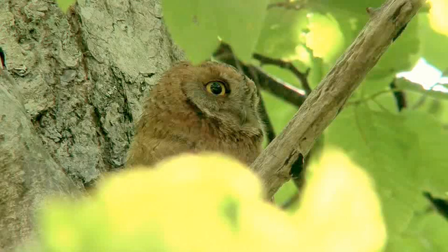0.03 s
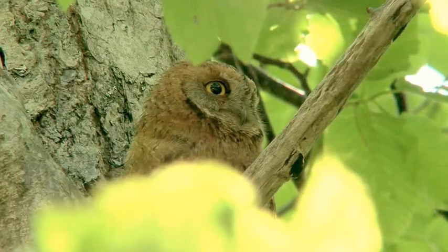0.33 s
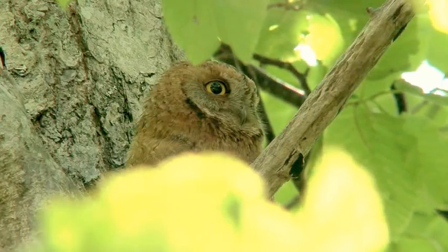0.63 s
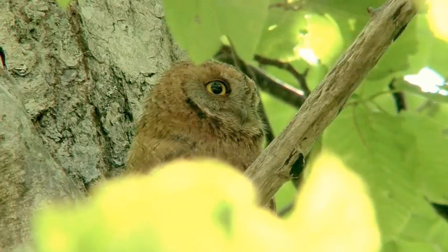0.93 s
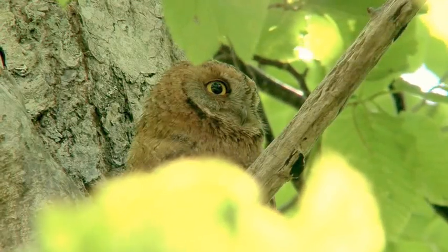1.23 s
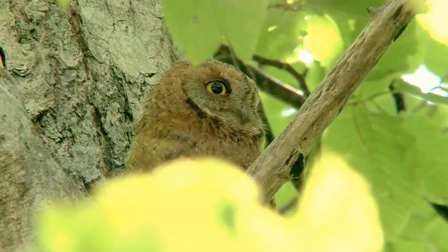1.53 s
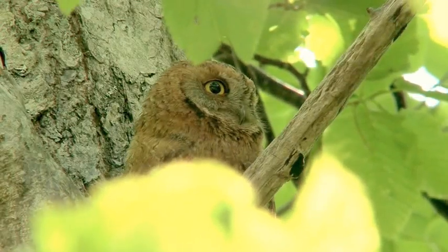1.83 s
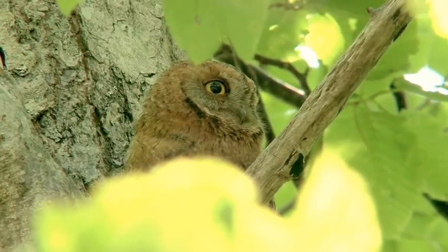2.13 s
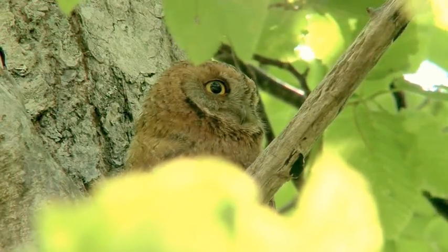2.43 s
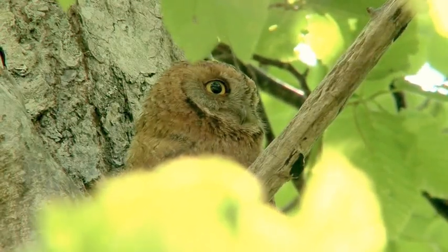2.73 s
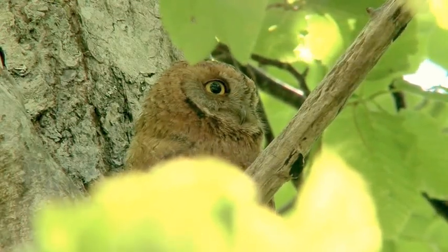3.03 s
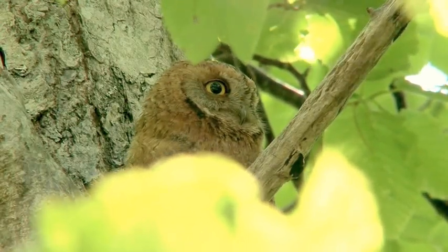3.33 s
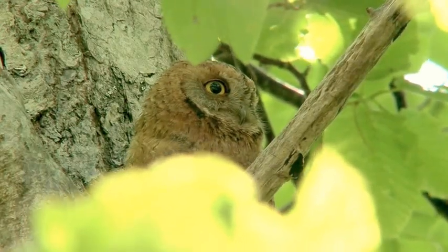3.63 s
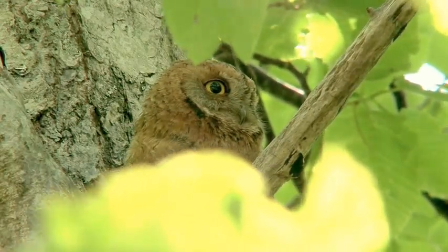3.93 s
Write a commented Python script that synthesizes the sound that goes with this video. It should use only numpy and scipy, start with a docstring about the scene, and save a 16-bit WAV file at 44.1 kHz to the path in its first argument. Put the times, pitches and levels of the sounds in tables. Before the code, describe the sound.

A cicada buzzes close to the microphone in quick, even, high-pitched throbs, then turns ragged and stops. Behind it, trees hiss steadily over a low rumble, with a faint far insect and a few distant bird notes.

```python
"""Cicada in a leafy wood

Near the microphone an insect, probably a cicada, throbs: its tymbals click about 260 times a second into
a narrow resonance near 3 kHz, faster and louder within each throb, until the song frays and stops.
A second one sings far off, a little to the right; a few distant bird notes sit in the trees' hiss."""
import sys
import numpy as np
from scipy import signal
from scipy.fft import rfft, irfft
from scipy.io import wavfile
from scipy.ndimage import uniform_filter1d

SR = 44100
rng = np.random.default_rng(int(sys.argv[2]) if len(sys.argv) > 2 else 0)


def persist_wave(psi):
    """Save psi, clipped to +-1, as 16-bit WAV."""
    counts = np.round(np.clip(psi, -1, 1) * 32767).astype(np.int16)
    wavfile.write(sys.argv[1], SR, np.atleast_2d(counts).T)


N = 176400


def amp(db):
    """Decibels to gain."""
    return 10 ** (np.asarray(db) / 20)


def unit(x):
    """Scales to rms 1."""
    return x / np.sqrt(np.mean(x ** 2) + 1e-20)


def read_spectrum(points, hz):
    """Reads a spectrum table on a log-frequency axis."""
    f, value = np.transpose(points)
    return np.interp(np.log(hz + 1), np.log(f + 1), value)


def clock():
    """Time of every sample, in seconds."""
    return np.arange(N) / SR


def drift(hz):
    """Smooth random wander of rms 1, up to about hz."""
    f = np.fft.rfftfreq(N, 1 / SR)
    return unit(irfft(rfft(rng.standard_normal(N)) * np.exp(-(f / hz) ** 2), N))


def pan(db):
    """Channel gains for a left-minus-right level."""
    return amp([[db / 2], [-db / 2]])


def resonate(x, hz, width_hz):
    """A resonance of gain 1 that follows the curve hz."""
    turn = np.exp(2j * np.pi * np.cumsum(hz) / SR)
    pole = np.exp(-np.pi * width_hz / SR)
    return 2 * (turn * signal.lfilter([1 - pole], [1, -pole], x / turn + 1e-18)).real


def wood_echoes(x, t60_s=.4, build_s=.008):
    """Scattered echoes from trunks and leaves, different at each microphone, as strong as x."""
    t = np.arange(SR // 2) / SR
    taps = rng.standard_normal((2, len(t))) * (rng.random((2, len(t))) < .1)
    tail = taps * np.exp(-np.log(1000) * t / t60_s) * np.minimum(t / build_s, 1)
    wet = signal.fftconvolve(x[None], tail, axes=1)[:, :N]
    return wet * x.std() / wet.std(axis=1, keepdims=True)


# Throbs of the near cicada: centre_s, relative_level_db, top_click_rate_hz, half_length_s
SONG_THROBS = [(0.094, -1, 262, .024), (0.217, -1.5, 261.5, .025), (.347, -0.9, 261.2, 0.028),
               (.466, 0, 261.5, 0.024), (.597, 0.6, 260.4, 0.026), (.734, -1.5, 258.8, .030),
               (0.861, -2, 259.5, .031), (.986, -1.8, 258.1, .033), (1.118, -1.5, 260.5, 0.029),
               (1.26, -0.4, 259.6, 0.029), (1.394, -1, 259, .031), (1.534, -1.5, 259.6, .030),
               (1.675, -1, 261, 0.032), (1.818, -2, 258.4, .033), (1.96, 0.1, 260, .030),
               (2.092, -1.2, 257.5, .033), (2.246, 0.1, 260.5, .029), (2.401, -0.5, 260, .025),
               (2.54, -3.5, 257.5, .027), (2.689, -4.5, 256, .033), (2.83, -4.5, 250.8, .035),
               (2.995, -10.5, 243.6, .030), (3.115, -8.5, 245, 0.0364)]
# Uneven timing of its clicks, growing as the song frays: time_s, scatter_ms
CLICK_SCATTER = [(.1, .011), (2.7, .011), (2.83, .07), (3.15, .1)]


def cicada(rest_rate_hz=241.5, between_throbs_db=-9.6, end_s=3.16, release_s=.028, level_db=-24):
    """Close by, left of centre: tymbal clicks ring the body, faster, higher and louder in each throb."""
    t = clock()
    rate, level = np.full(N, rest_rate_hz), np.full(N, amp(between_throbs_db))
    for centre, db, top_hz, half in SONG_THROBS:
        away = abs(t - centre) / (half * np.where(t < centre, .92, 1))  # rises quicker than it falls
        rate += (top_hz - rest_rate_hz) * np.exp(-(away / 1.5) ** 4.2)  # flat-topped arch
        level += (amp(db) - amp(between_throbs_db)) * np.exp(-away ** 2.7)
    level *= np.exp(-np.maximum(t - end_s, 0) / release_s)
    # One click a cycle; the timing loosens as the muscle slackens between throbs.
    cycles = np.cumsum(rate * (1 + .004 * drift(64))) / SR
    slip, size = rng.standard_normal((2, N))[:, :int(cycles[-1])]
    due_s = np.interp(np.arange(len(slip)), cycles, t)
    slack = 1 - (rate - rest_rate_hz) / (rate.max() - rest_rate_hz)
    scatter_ms = np.interp(due_s, *np.transpose(CLICK_SCATTER)) + .044 * np.interp(due_s, t, slack ** 2)
    position = np.clip((due_s + slip * scatter_ms / 1000) * SR, 0, N - 2)
    clicks, sample, strength = np.zeros(N), position.astype(int), amp(.7 * size)
    clicks[sample] += strength * (1 - position % 1)
    clicks[sample + 1] += strength * (position % 1)
    # The body tightens with effort, raising the ring; uneven clicks ring more broadly.
    ring_hz = 2797 + 8.3 * (rate - rest_rate_hz)
    tight, broad = (resonate(resonate(clicks, ring_hz, width_hz), ring_hz, width_hz)
                    for width_hz in (170, 400))
    looseness = np.minimum(np.interp(t, position / SR, scatter_ms) / .09, 1) ** 2
    ring = (1 - looseness) * tight + looseness * broad
    ring_rms = np.sqrt(uniform_filter1d(ring ** 2, size=3000) + 1e-14)
    buzz = level * ring / ring_rms
    return amp(level_db) * pan(db=3) * (buzz + amp(-8.3) * wood_echoes(buzz))


def far_insect(pitch_hz=2950, swing_hz=35.3, throb_hz=7.4, blur_hz=590, blur_db=-37.5, tone_db=-38.5):
    """Far off, a little to the right: a wavering tone in a blur of its own echoes."""
    t, f = clock(), np.fft.rfftfreq(N, 1 / SR)
    throb = np.sin(2 * np.pi * throb_hz * t + .63 * drift(1.2))
    pitch = pitch_hz + swing_hz * throb + 18 * drift(100.3)
    tone = np.sin(2 * np.pi * np.cumsum(pitch) / SR)
    band = 1 / (1 + ((f - pitch_hz) / blur_hz) ** 2) ** 2
    blur = irfft(rfft(rng.standard_normal((2, N))) * band, N)
    blur = unit(blur + .36 * blur[::-1])  # partly shared by the two microphones
    echoing_tone = unit(tone + amp(-2) * wood_echoes(tone))
    return pan(db=-1.5) * (amp(blur_db) * blur + amp(tone_db) * echoing_tone)


# Hiss of the trees all around and distant rumble: frequency_hz, relative_density_db
AIR_SPECTRUM = [(15, -21), (28, -8), (45, -7.5), (70, 4.5), (130, 2), (250, -3), (500, -2.5), (800, -3),
                (1200, -4.5), (1750, -5), (2150, -3.5), (2500, -7.5), (3500, -9.5), (4300, -7),
                (5000, -9.5), (6500, -10.5), (8000, -14), (10000, -19), (12500, -28.5), (15000, -39)]
# How alike that noise is at the two microphones: frequency_hz, correlation
AIR_CORRELATION = [(50, -0.55), (100, -0.67), (170, 0.17), (290, 0.91), (640, 0.56), (1410, 0.37),
                   (3100, 0.72), (6820, 0.21), (10000, 0.55), (12500, 0.98)]
# The side it leans to: frequency_hz, left_minus_right_db
AIR_BALANCE = [(60, 6.5), (110, 2), (200, 3), (380, 1.5), (700, 0), (1290, -1), (2380, -1.6), (4400, -1.4),
               (8120, -.2)]
# Brief swells of the rumble: centre_s, half_length_s, frequency_hz, boost_db
RUMBLE_SWELLS = [(2.235, 0.044, 85, 7.5), (2.6, 0.3, 34, 6), (3.33, 0.054, 120, 8)]


def trees_and_rumble(level_db=-30, patch_db=.6, wander_db=.35, swell_octaves=.53):
    """All around the microphones: steady hiss of trees over a low rumble, with slight drifting patches."""
    size, hop = 2048, 512
    frames, hz = N // hop + 2, np.fft.rfftfreq(size, 1 / SR)
    left_re, left_im, other_re, other_im, patches = rng.standard_normal((5, frames, len(hz)))
    patches = uniform_filter1d(patches, size=10, axis=0)
    patches = unit(uniform_filter1d(patches, size=16, axis=1))
    alike = np.clip(read_spectrum(AIR_CORRELATION, hz), -.99, .99)
    left = left_re + 1j * left_im
    right = alike * left + np.sqrt(1 - alike ** 2) * (other_re + 1j * other_im)
    lean = amp(read_spectrum(AIR_BALANCE, hz) / 2)
    t, octaves = np.arange(frames)[:, None] * hop / SR, np.log2(hz + 1)
    swells = sum(db * np.exp(-((t - centre) / half) ** 2 - ((octaves - np.log2(f)) / swell_octaves) ** 2)
                 for centre, half, f, db in RUMBLE_SWELLS)
    colour = amp(read_spectrum(AIR_SPECTRUM, hz) + patch_db * patches + swells)
    spectra = np.array([left * lean, right / lean]) * colour
    _, noise = signal.istft(spectra, nperseg=size, noverlap=size - hop, time_axis=1, freq_axis=2)
    return amp(level_db + wander_db * drift(6)) * unit(noise[:, :N])


# Bird notes from deep in the wood: centre_s, length_s, pitch_hz, glide_hz, level_db, waver_hz
BIRD_NOTES = [(1.287, 0.19, 2110, 13, -41, 40.8), (1.762, .16, 2090, -59.5, -41, 40),
              (2.547, .36, 2233, 69, -37, 55), (2.72, 0.157, 4590, 100, -40, 202.5),
              (2.813, 0.104, 4372, -100, -33.5, 171.6), (3.691, 0.2, 2396, 19, -38, 54.8),
              (3.942, 0.081, 4430, -41, -28, 112)]


def birds(echo_db=-6):
    """In the distance: faint whistles and chips, smeared by the trees."""
    t, notes = clock(), np.zeros(N)
    for centre, length, hz, glide_hz, db, waver_hz in BIRD_NOTES:
        progress = np.clip((t - centre) / length, -.5, .5)
        pitch = hz + glide_hz * progress + waver_hz * drift(198)
        notes += amp(db) * np.cos(np.pi * progress) * np.sin(2 * np.pi * np.cumsum(pitch) / SR)
    return notes + amp(echo_db) * wood_echoes(notes)


def scene():
    """Everything heard from under the tree."""
    return cicada() + far_insect() + trees_and_rumble() + birds()


def record(dry, start_s=.083, cutoff_hz=15300):
    """The stereo microphone: a moment of silence, then the wood with the top treble cut steeply."""
    lowpass = signal.firwin(511, cutoff_hz, window=("kaiser", 9), fs=SR)
    return signal.oaconvolve(dry * (clock() >= start_s), lowpass[None], "same")


dry = scene()
out = record(dry)
persist_wave(out)
```